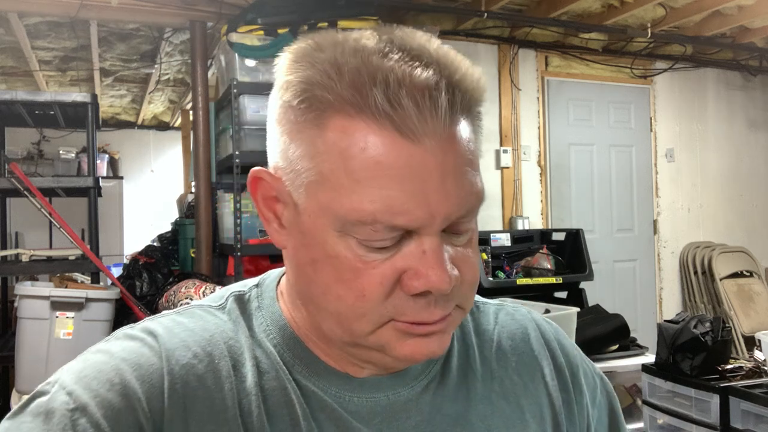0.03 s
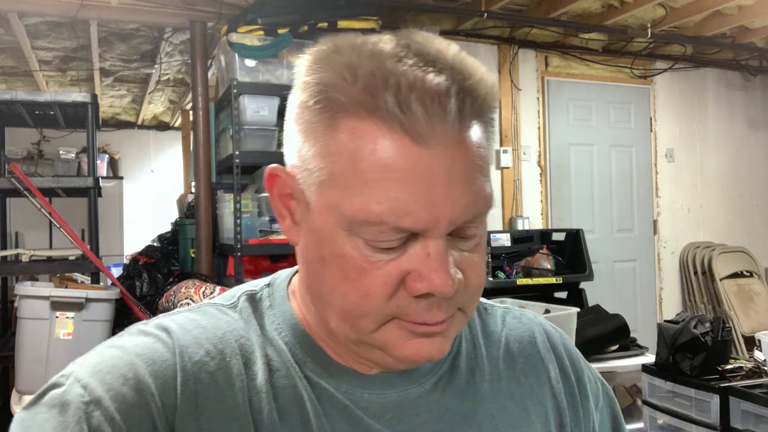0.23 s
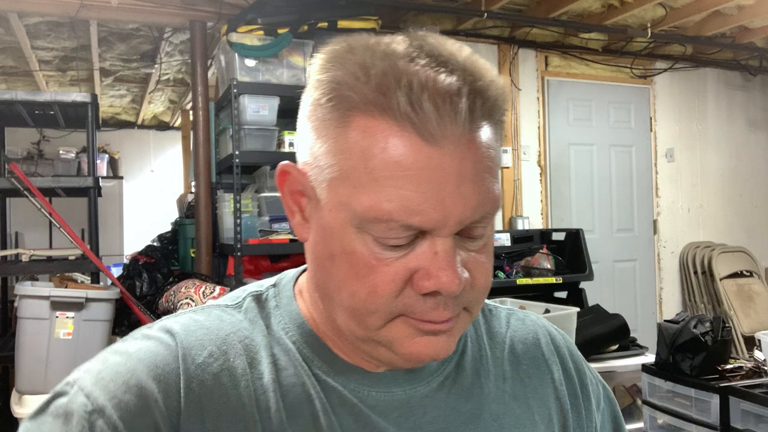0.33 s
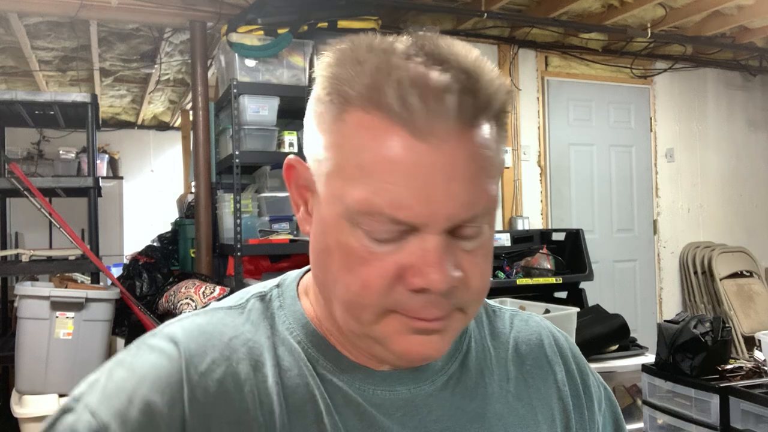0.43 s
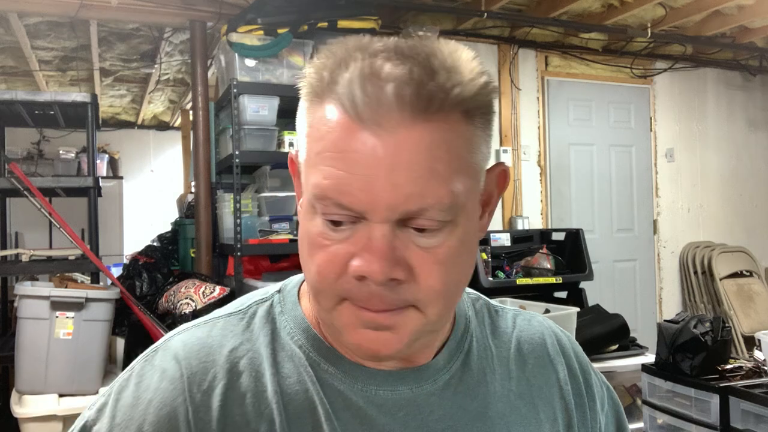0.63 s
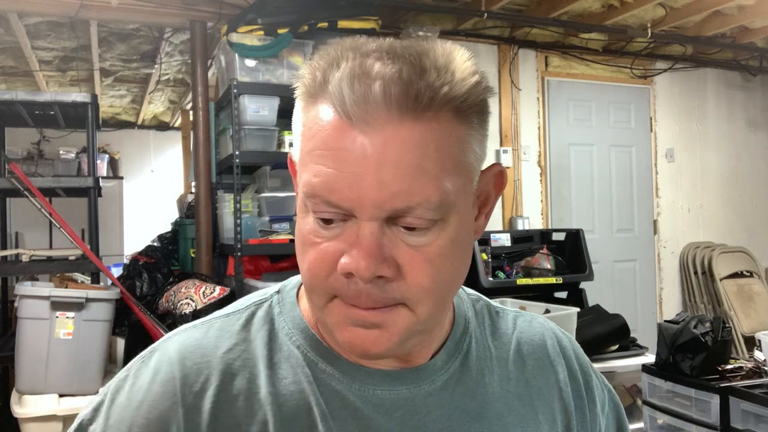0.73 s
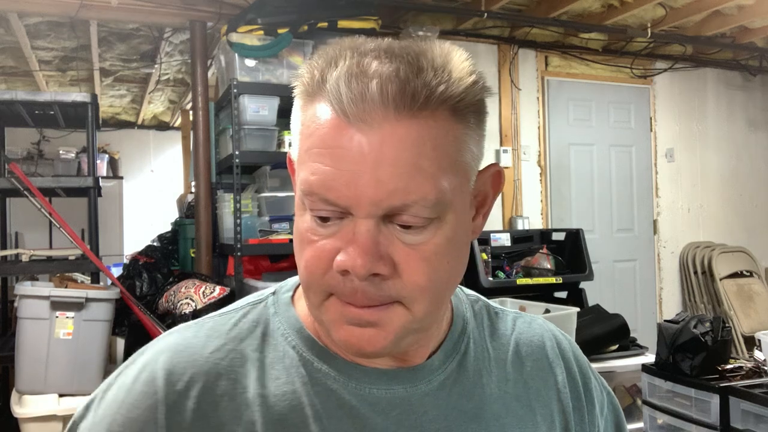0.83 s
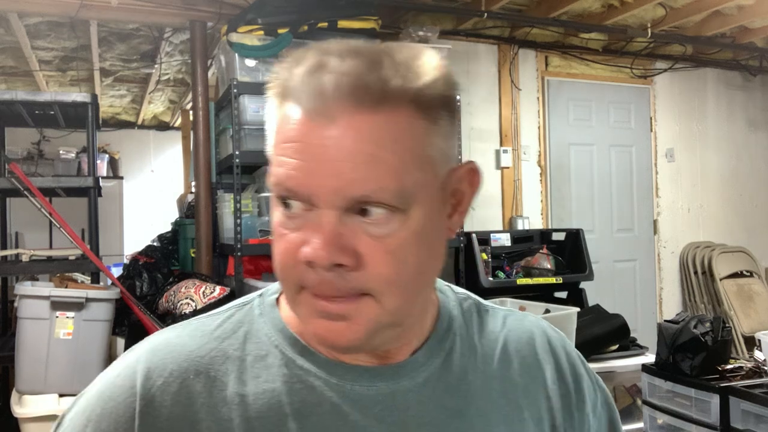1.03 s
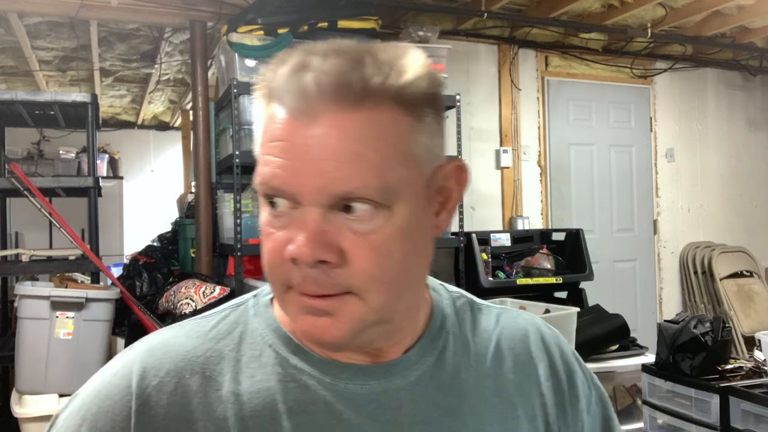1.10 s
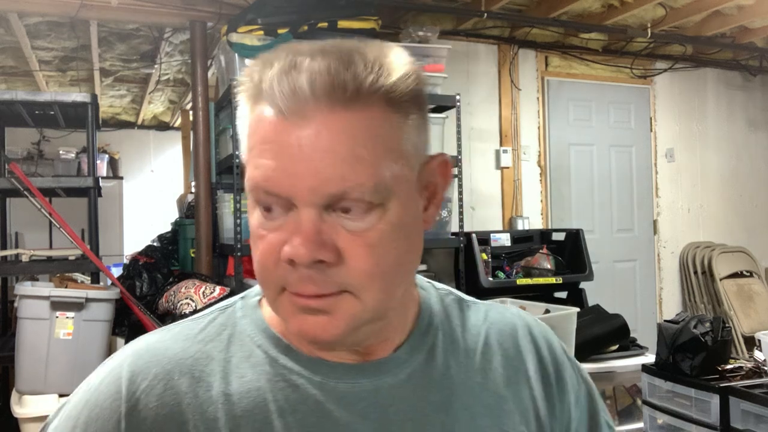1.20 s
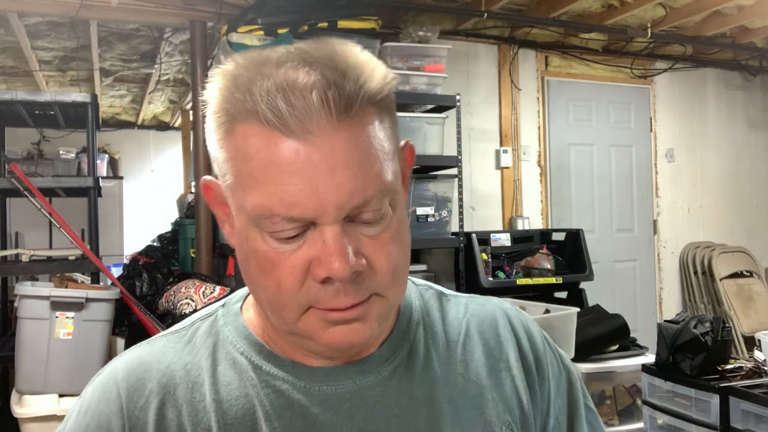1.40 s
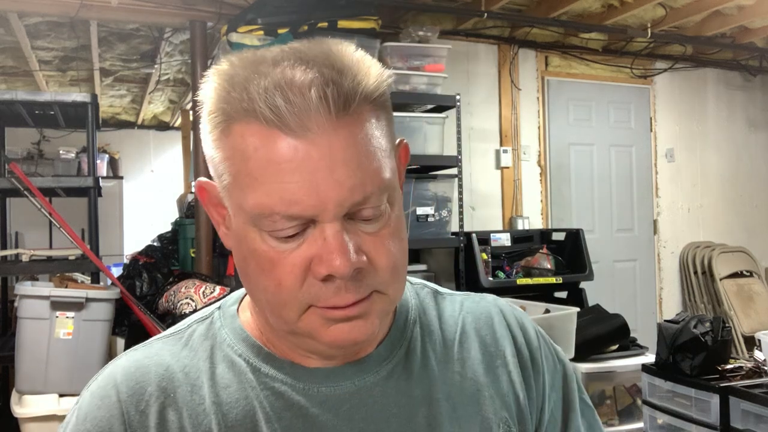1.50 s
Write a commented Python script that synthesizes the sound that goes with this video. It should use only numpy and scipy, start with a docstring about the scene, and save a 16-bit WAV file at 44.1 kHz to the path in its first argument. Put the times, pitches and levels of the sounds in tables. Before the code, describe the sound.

In a cluttered basement with a short, dry echo, scissors bite hard into rigid plastic with snaps and crinkles, click and scrape open, pause, then bite again more lightly, while a quiet motor hum throbs underneath.

```python
"""Two motors, slightly out of step, beat throughout over mains hum and soft noise in a basement.
After faint ticks, scissors bite into a stiff plastic pack: bursts of noise, filtered by the resonances
of the shell, snap in a run, and showers of random grains crinkle between and after them. Damped sines
are the pack bumping in the hand. The blades then click open and slide with a hiss of dense grains.
A second bite snaps and crinkles, and scattered ticks end the scene."""
import sys
import numpy as np
from scipy import signal
from scipy.fft import rfft, irfft
from scipy.io import wavfile
from scipy.ndimage import uniform_filter1d

SR = 44100
rng = np.random.default_rng(int(sys.argv[2]) if len(sys.argv) > 2 else 0)


def waveform_to_disk(signal):
    """Save audio, clipped to [-1, 1], as 16-bit WAV at the path in sys.argv[1]."""
    frames = np.transpose(np.atleast_2d(signal))
    scaled = np.clip(frames, -1, 1) * 32767
    samples = np.round(scaled).astype(np.int16)
    wavfile.write(sys.argv[1], SR, samples)


N = 68355

# Two motors: (fundamental [Hz], its level [dB], octave level [dB])
MOTOR_TONES = [(58.55, -61, -71.5), (53.15, -64.5, -79.5)]
# Spectrum of the room noise, relative: (frequency [Hz], density [dB per Hz])
ROOM_NOISE_SPECTRUM = [(20, -53), (42, -24), (65, -0.5), (100, 2), (140, -4), (175, 0.5), (210, -7.5),
                       (330, -7), (450, -11), (700, -15.5), (1000, -18.5), (2000, -21.5), (4000, -26.5),
                       (8000, -28), (12000, -30), (16000, -29.5)]
# Reverberation time of the basement: (frequency [Hz], t60 [s])
ROOM_DECAY = [(100, 0.15), (400, 0.3), (1500, 0.21), (4000, 0.19), (10000, 0.096), (16000, 0.15)]
# Dull bumps of the pack in the hand: (time [s], level [dB], frequency [Hz], t60 [s])
PACK_BUMPS = [(0.203, -48, 177, 0.12), (0.2865, -32, 577, 0.076), (0.2865, -40.5, 704, 0.16),
              (0.291, -42, 135.3, 0.51), (0.321, -40, 96.7, 0.26), (0.39, -40, 119.7, 0.41),
              (0.428, -47, 457, .1), (1.214, -45, 355, 0.094), (0.645, -53.5, 515, .08),
              (0.644, -56, 334, 0.11), (0.646, -54, 760, 0.093), (0.654, -38, 78.4, 0.094),
              (0.68, -48, 121, 0.3)]
# The blades slide open: (time [s], level [dB])
SLIDE_LEVEL = [(0.647, -66), (0.659, -52), (0.69, -52), (0.706, -49), (0.718, -52.5), (0.737, -52),
               (0.747, -75), (0.775, -82), (0.82, -75)]
# Spectrum of the sliding steel, relative: (frequency [Hz], gain [dB])
SLIDE_SPECTRUM = [(100, -22), (500, -0.5), (1200, -8), (2200, -5), (4500, -3), (6400, 2.5), (7200, 7.5),
                  (7900, 2.5), (11000, 2), (16000, -2)]
# Light ticks of blades and creases: (time [s], level [dB], centre [Hz], t60 [s])
BLADE_TICKS = [(0.0225, -66.5, 5960, 0.0067), (0.03, -63, 5800, 0.0087), (0.038, -63.5, 6260, 0.054),
               (0.0606, -55.5, 7900, 0.02), (0.1238, -64.5, 8100, 0.049), (0.138, -59.5, 5770, .06),
               (0.216, -64, 6650, 0.014), (0.2216, -47, 2060, 0.021), (0.2225, -48.5, 753, 0.096),
               (0.246, -66, 11900, 0.019), (0.2636, -64, 8600, 0.12), (0.389, -50.5, 2460, 0.055),
               (0.458, -66, 5230, 0.087), (0.6431, -50, 8400, .005), (0.645, -51.5, 7100, 0.0062),
               (0.6465, -60.5, 1300, 0.044), (0.731, -61.5, 3600, 0.055), (0.77, -66, 4640, 0.051),
               (1.187, -61, 1900, 0.061), (1.1972, -54.5, 2500, 0.016), (1.2385, -53, 8200, 0.025),
               (1.306, -55, 2000, 0.069), (1.34, -51, 1920, 0.022), (1.3501, -54, 3370, 0.014),
               (1.408, -59, 3520, 0.017), (1.4148, -53.5, 5970, 0.13), (1.417, -55.5, 1590, 0.017),
               (1.4248, -51, 1530, 0.047), (1.426, -56.5, 2500, 0.051), (1.43, -55.5, 9900, .06),
               (1.513, -64, 13600, 0.073), (1.5178, -59, 2700, 0.039), (1.535, -61.5, 2500, 0.034),
               (1.5468, -55, 2750, 0.079)]
# Resonances of the shell; their strength changes as the cut moves along:
# (frequency [Hz], width before the floor in peak() [Hz], lift in first bite [dB], lift in second [dB])
SHELL_MODES = [(258.7, 14, 6.5, 6.5), (357, 55, 8, 7), (456.3, 42, 11, -5.5), (705, 210, 7.5, 0),
               (817, 59, -11, 9), (957, 123, 8.5, -3.5), (1270, 400, 5.5, 3.5), (1537, 122, -7, 3),
               (1930, 250, 4, 8.5), (2253, 230, 6.5, 7), (2725, 354, 8, 8), (3600, 510, 4.5, 6.5),
               (5720, 1200, -2.5, -1.5), (5700, 550, 1, 4)]
# Crinkling under the blades: (start [s], length [s], starting level [dB], change over the length [dB],
# grain rate [1/s], brightness [dB per octave, well above 500 Hz])
CRINKLE_SHOWERS = [(0.317, 0.082, -41.5, -7, 1500, 0), (0.398, 0.045, -44.5, -13, 1900, -2),
                   (1.202, 0.136, -47.5, -17, 900, 0.5), (1.312, 0.147, -62.5, -3, 660, 0.7)]
# Spectrum of the crinkling, relative: (frequency [Hz], gain [dB])
CRINKLE_SPECTRUM = [(60, -8.5), (150, 6.5), (400, 5.5), (800, -5), (1500, -3), (2500, -10.5), (5000, -13),
                    (10000, -10.5), (16000, -14.5)]
# Snaps of the plastic, with relative band levels: (time [s], thud [dB], knock [dB], ring [dB],
# crack [dB], t60 [s], pitch of the freed edge [Hz])
PLASTIC_SNAPS = [(0.2012, -49.5, -54, -48.5, -46, 0.046, 1370),
                 (0.2213, -40.5, -51, -37.5, -50.5, 0.025, 3540),
                 (0.2863, -26.5, -39.5, -34.5, -31, 0.05, 4930),
                 (0.3151, -37, -31.5, -27, -22.5, .035, 6250), (0.3636, -47, -41, -37, -39, 0.061, 1870),
                 (1.1984, -40.5, -45.5, -51.5, -45.5, 0.033, 2010),
                 (1.2122, -57, -43.5, -33.5, -45, 0.047, 3170),
                 (1.2154, -45.5, -44, -31, -35.5, 0.013, 5950), (1.2441, -47, -43.5, -35, -32, 0.021, 8660),
                 (1.2786, -47, -49, -40.5, -44, 0.04, 2010)]
# Bands of thud, knock, ring and crack: (lower edge [Hz], upper edge [Hz])
BAND_EDGES = [(150, 800), (800, 1800), (1800, 5000), (5000, 16000)]

TAPS = 8192
HZ = np.fft.rfftfreq(TAPS, 1 / SR)
TIME = np.arange(N) / SR
CUTOFF_HZ = 15800

MAINS_HZ, MAINS_DB, ROOM_TONE_DB = 119.8, -65, -67.5
ROOM_DB, ROOM_DELAY_S = -11.5, 0.008
SHELL_DB, SECOND_BITE_S = -7, 1
MIN_WIDTH = 0.08  # narrowest resonance, as a share of its pitch

# a fracture is a few tears in quick succession, and its first instant stands out
SPLINTERS, SPLINTER_DB, SPLINTER_MIN_S, SPLINTER_MAX_S = 5, -7.0206, 0.000265, 0.0025
FIRST_CRACK_DB, FIRST_CRACK_T60 = 0.5, 0.0053
# the bench and the body throw each fracture straight back
REFLECT_DB, REFLECT_S = -18.0206, 0.011

SLIDE_GRAINS_PER_S, SLIDE_SPREAD_DB = 16000, 1.5
SLIDE_CATCH_DB, SLIDE_CATCH_HZ = 1.2, 100  # rms depth and bandwidth of the level flutter

TICK_SLOPE_DB = 4.5  # fall at one octave from the centre
TICK_RING_DB, TICK_WIDTH = 9, 0.083  # lift at the centre; its width as a share of the centre
TICK_LOW_SHARE = 0.31  # a tick holds little below this share of its centre

GRAIN_SPREAD_DB = 3
EDGE_LIFT_DB, EDGE_WIDTH = 7, 0.08  # width as a share of the pitch
SNAP_DB = -1.5
SUB_DB, BASS_DB, AIR_DB = -8.5, -5, -7.5  # slopes of a snap beyond its outer bands

GAIN_KNEE_DB, GAIN_TIME_S = -51.5, 0.18
GAIN_SHARE = 0.25  # dB taken off per dB above the knee


def amp(db):
    """Level law: converts decibels to an amplitude ratio."""
    return 10 ** (np.asarray(db) / 20)


def unit(x):
    """Normalisation: scales a signal to rms 1."""
    return x / np.sqrt(np.mean(x ** 2) + 1e-20)


def read(points, hz=HZ):
    """Interpolation along a logarithmic frequency axis."""
    f, value = np.transpose(points)
    return np.interp(np.log(hz + 1), np.log(f + 1), value)


def fade(t, t60):
    """Exponential decay: damping takes the level down 60 dB in t60."""
    return amp(-60 * t / t60)


def add(mix, s, sound):
    """Superposition: mixes a sound in at time s."""
    part = mix[max(round(s * SR), 0):][:len(sound)]
    part += sound[:len(part)]


def colour(x, db):
    """Minimum-phase filtering: the gain over HZ fixes the phase, so nothing sounds early."""
    mirrored = np.r_[db, db[-2:0:-1]]
    log_gain = np.log(amp(np.maximum(mirrored, db.max() - 80)))
    response = np.exp(np.conj(signal.hilbert(log_gain)))[:len(HZ)]
    impulse = irfft(response)[:TAPS // 2]
    return signal.fftconvolve(x, impulse)[:len(x)]


def peak(hz, width):
    """Resonance curve over HZ, top 1; lossy plastic keeps its width above a share of the pitch."""
    return 1 / (1 + (2 * (HZ - hz) / max(width, MIN_WIDTH * hz)) ** 2)


def shell(s):
    """Modal response: the gain in dB of the shell's resonances at time s."""
    gain = SHELL_DB
    for hz, width, first, second in SHELL_MODES:
        lift = first if s < SECOND_BITE_S else second
        gain = gain + lift * peak(hz, width)
    return gain


def burst(t60):
    """Brittle fracture: tears scatter through the sheet and off near surfaces; rms 1 over 10 ms."""
    t = np.arange(TAPS) / SR
    direct = fade(t, t60) + amp(FIRST_CRACK_DB) * fade(t, FIRST_CRACK_T60)
    reflected = amp(REFLECT_DB) * (t > 0.003) * np.exp(-(t / REFLECT_S) ** 4)
    z = rfft(rng.standard_normal(TAPS) * np.hypot(direct, reflected))
    # dividing by the smoothed spectrum evens out the noise
    even = z / np.sqrt(uniform_filter1d(abs(z) ** 2, size=30) + 1e-9)

    delay = rng.uniform(SPLINTER_MIN_S, SPLINTER_MAX_S, (SPLINTERS, 1))
    sign = rng.choice([-1, 1], (SPLINTERS, 1))
    echoes = (sign * np.exp(-2j * np.pi * HZ * delay)).sum(0)
    # the later tears are weak in the bass
    tears = 1 + amp(SPLINTER_DB) * echoes * HZ / (HZ + 1000)
    x = irfft(tears * even)
    x[TAPS // 2:] = 0
    return x / np.linalg.norm(x) * np.sqrt(0.01 * SR)


def grains(per_s, spread_db):
    """Stick-slip friction: random clicks of either sign and uneven size."""
    size = amp(spread_db * np.minimum(rng.exponential(1, N), 4))
    return size * rng.choice([-1, 1], N) * (rng.random(N) < per_s / SR)


def hum():
    """Beats: two motors of nearby pitch drift in and out of phase, over mains hum and room noise."""
    start = rng.random()
    tones = amp(MAINS_DB) * np.sin(2 * np.pi * (MAINS_HZ * TIME + 2 * start))
    for k, (hz, db, octave_db) in enumerate(MOTOR_TONES):
        # the fundamentals start in opposition
        turn = 2 * np.pi * (hz * TIME + start + k / 2)
        tones += amp(db) * np.sin(turn) + amp(octave_db) * np.sin(2 * turn)
    # the extra TAPS let the filter settle
    noise = colour(rng.standard_normal(N + TAPS), read(ROOM_NOISE_SPECTRUM))[TAPS:]
    # root two makes the tone levels rms
    return np.sqrt(2) * tones + amp(ROOM_TONE_DB) * unit(noise)


def room(x):
    """Reverberation: a cluttered basement returns a short tail that decays by frequency."""
    hz, t, z = signal.stft(rng.standard_normal(SR // 2), SR, nperseg=256)
    decay = amp(-60 * t / read(ROOM_DECAY, hz)[:, None])
    tail = signal.istft(z * decay, SR, nperseg=256)[1]
    out = np.zeros(N)
    add(out, ROOM_DELAY_S, signal.fftconvolve(x, tail / np.linalg.norm(tail)))
    return out


def bumps():
    """Damped oscillation: the whole pack wobbles briefly when it is jolted."""
    out = np.zeros(N)
    for s, db, hz, t60 in PACK_BUMPS:
        envelope = fade(TIME, t60) * (1 - fade(TIME, 0.01))
        add(out, s, amp(db) * envelope * np.sin(2 * np.pi * hz * TIME))
    return out


def slide():
    """Sliding friction: steel rubs on steel in dense grains as the scissors open."""
    level = amp(np.interp(TIME, *np.transpose(SLIDE_LEVEL)))
    level *= (TIME > SLIDE_LEVEL[0][0]) * (TIME < SLIDE_LEVEL[-1][0])
    lowpass = signal.butter(2, SLIDE_CATCH_HZ, fs=SR, output="sos")
    catch = unit(signal.sosfilt(lowpass, rng.standard_normal(N)))
    rub = grains(SLIDE_GRAINS_PER_S, SLIDE_SPREAD_DB) * amp(SLIDE_CATCH_DB * catch)
    return level * unit(colour(rub, read(SLIDE_SPECTRUM)))


def ticks():
    """Impulse response: small clicks, each ringing briefly at its centre."""
    out = np.zeros(N)
    for s, db, hz, t60 in BLADE_TICKS:
        ratio = (HZ + 1) / hz
        skirts = TICK_SLOPE_DB * np.log2(1 + np.log2(ratio) ** 2)
        low_cut = 10 * np.log10(1 + (TICK_LOW_SHARE / ratio) ** 6)
        shape = TICK_RING_DB * peak(hz, TICK_WIDTH * hz) - skirts - low_cut + shell(s)
        # taking off the mean power of the shape leaves the tick at its own level
        mean_db = 10 * np.log10(np.mean(amp(shape) ** 2))
        add(out, s, colour(burst(t60), db + shape - mean_db))
    return out


def crinkles():
    """Shot noise: showers of tiny fractures ring the shell as the blades push on."""
    out = np.zeros(N)
    for s, length, db, fade_db, per_s, bright_db in CRINKLE_SHOWERS:
        tilt = bright_db * np.log2(1 + HZ / 500)
        spectrum = read(CRINKLE_SPECTRUM) + shell(s) + tilt
        crackle = unit(colour(grains(per_s, GRAIN_SPREAD_DB), spectrum))
        u = (TIME - s) / length
        # a tenth of the length to swell, and a tenth beyond it to die away
        gate = np.clip(10 * np.minimum(u, 1.1 - u), 0, 1)
        out += crackle * amp(db + fade_db * np.clip(u, 0, 1)) * gate
    return out


def snaps():
    """Sudden release of strain: the plastic gives way in jerks, each with its own thud and crack."""
    out = np.zeros(N)
    lo, hi = np.transpose(BAND_EDGES)
    for s, *levels, t60, edge_hz in PLASTIC_SNAPS:
        # band level to density: a wide band spreads its power thinner
        db = np.array(levels) - 10 * np.log10((hi - lo) / (SR / 2))
        bass = [(40, db[0] + SUB_DB), (130, db[0] + BASS_DB)]
        shape = [*bass, *zip(np.sqrt(lo * hi), db), (CUTOFF_HZ, db[-1] + AIR_DB)]
        edge = EDGE_LIFT_DB * peak(edge_hz, EDGE_WIDTH * edge_hz)
        add(out, s, colour(burst(t60), read(shape) + shell(s) + edge + SNAP_DB))
    return out


def scene():
    """Superposition: scissors and pack in the room, over the hum."""
    cutting = snaps() + ticks() + crinkles() + slide()
    return (cutting + amp(ROOM_DB) * room(cutting) + bumps() + hum())[None]


def record(dry):
    """Compression: slow gain control eases the level after loud snaps; then low cut and band limit."""
    keep = np.exp(-1 / (GAIN_TIME_S * SR))
    # two equal smoothing stages in a row follow the power
    power = signal.lfilter([(1 - keep) ** 2], [1, -2 * keep, keep ** 2], dry ** 2)
    excess_db = np.maximum(10 * np.log10(abs(power) + 1e-12) - GAIN_KNEE_DB, 0)
    eased = dry * amp(-GAIN_SHARE * excess_db)
    thin = signal.sosfilt(signal.butter(4, 40, "highpass", fs=SR, output="sos"), eased)
    band_limit = signal.firwin(511, CUTOFF_HZ, window=("kaiser", 9), fs=SR)
    return signal.oaconvolve(thin, band_limit[None], "same")


dry = scene()
out = record(dry)
waveform_to_disk(out)
```